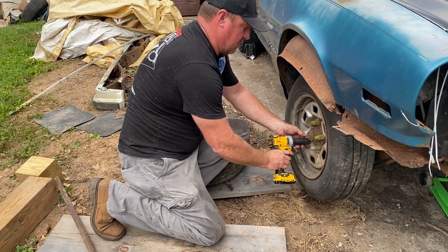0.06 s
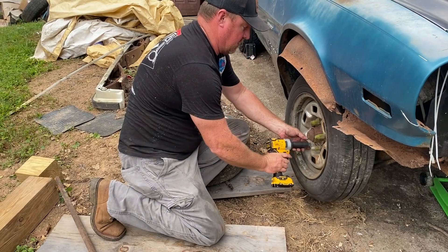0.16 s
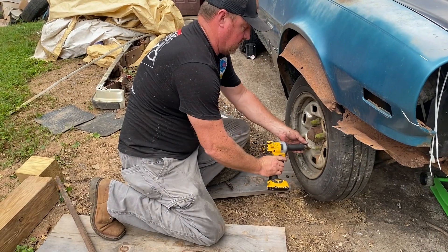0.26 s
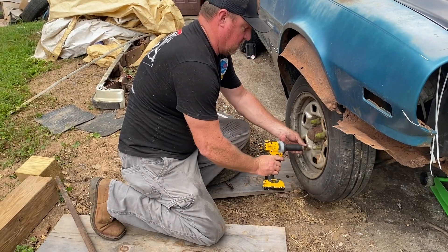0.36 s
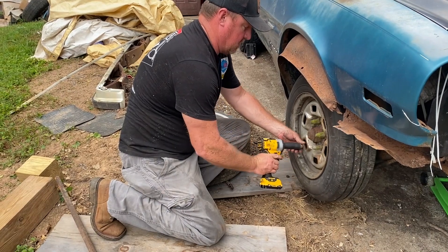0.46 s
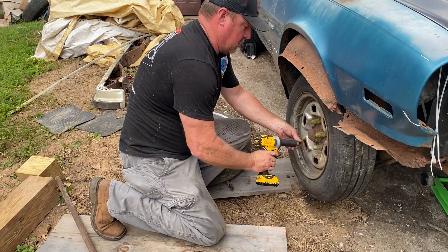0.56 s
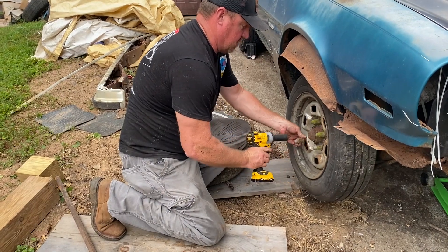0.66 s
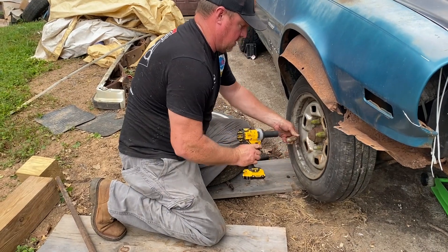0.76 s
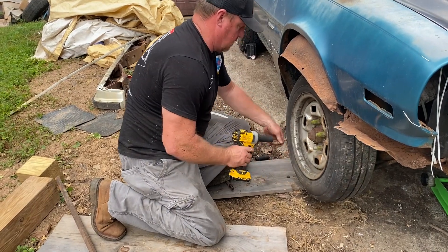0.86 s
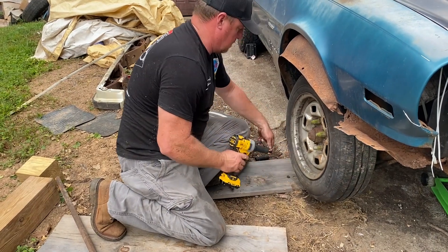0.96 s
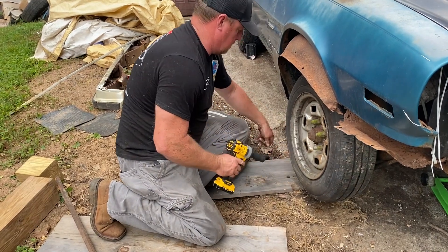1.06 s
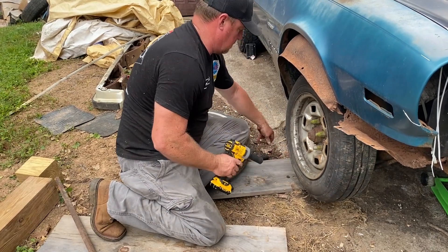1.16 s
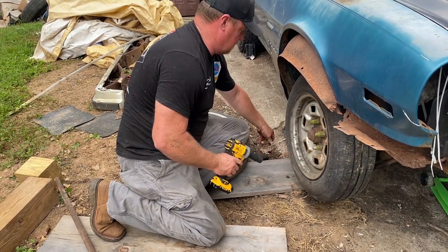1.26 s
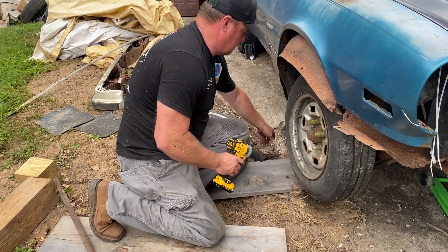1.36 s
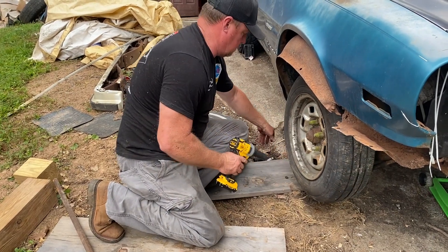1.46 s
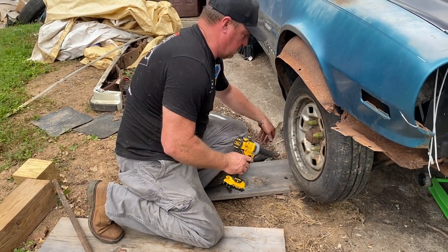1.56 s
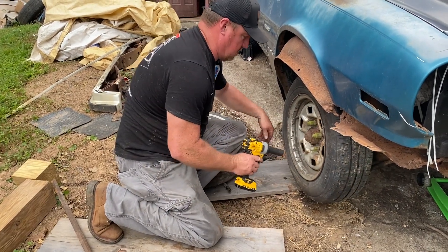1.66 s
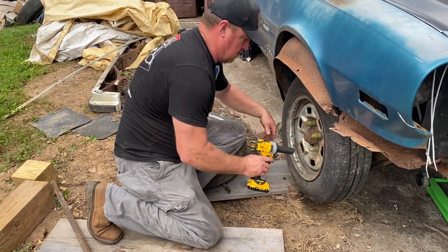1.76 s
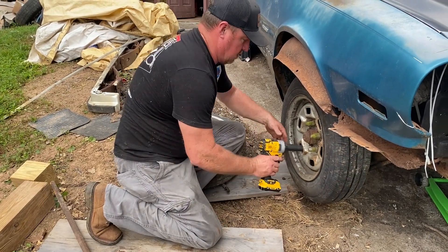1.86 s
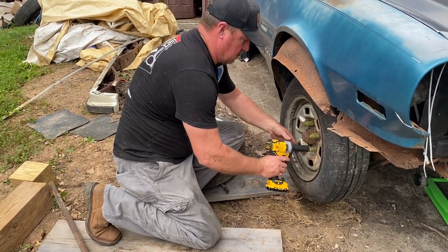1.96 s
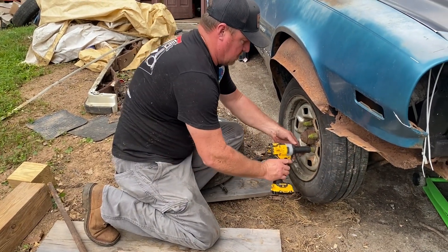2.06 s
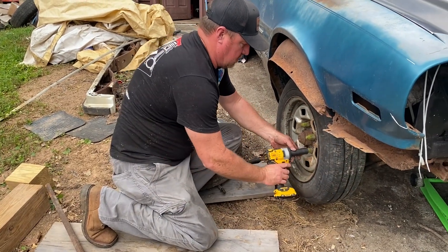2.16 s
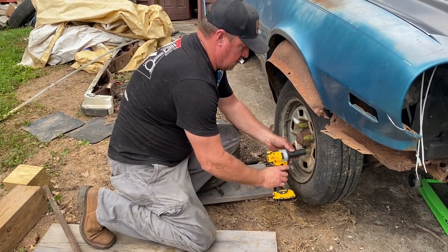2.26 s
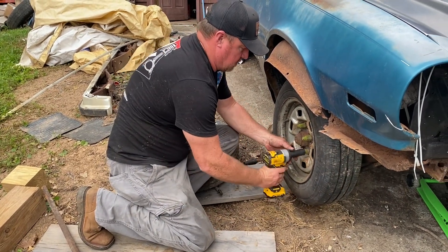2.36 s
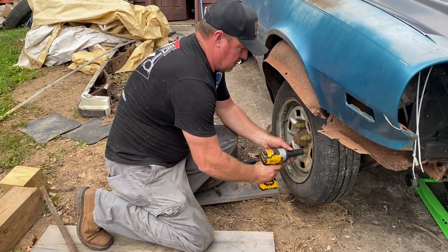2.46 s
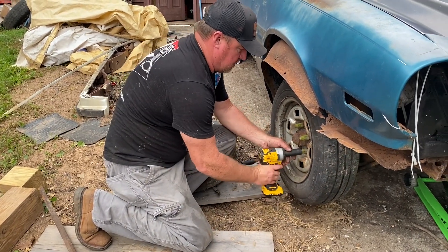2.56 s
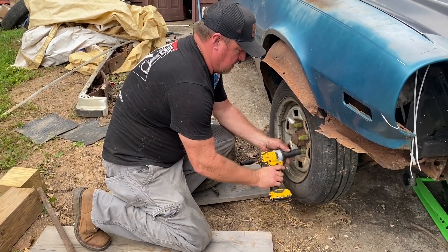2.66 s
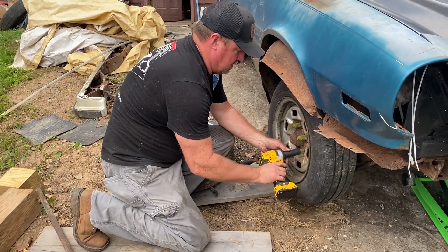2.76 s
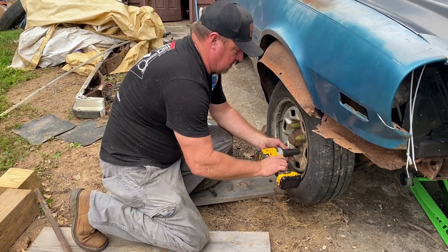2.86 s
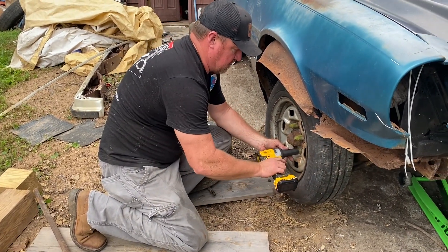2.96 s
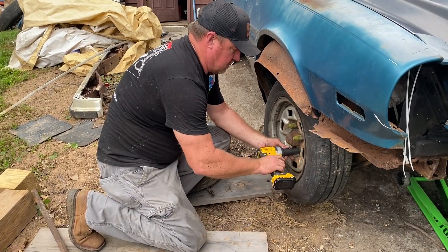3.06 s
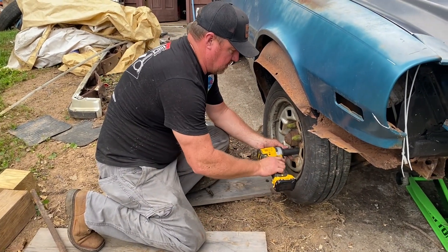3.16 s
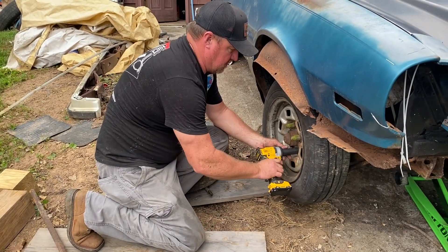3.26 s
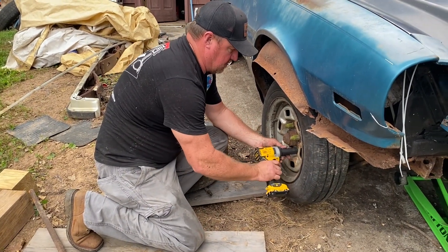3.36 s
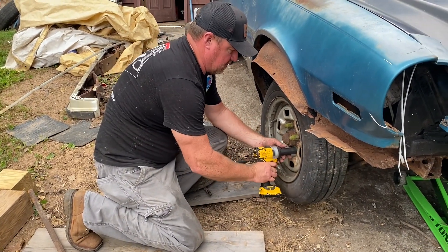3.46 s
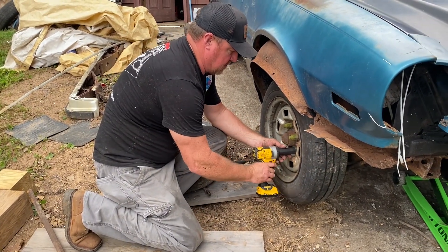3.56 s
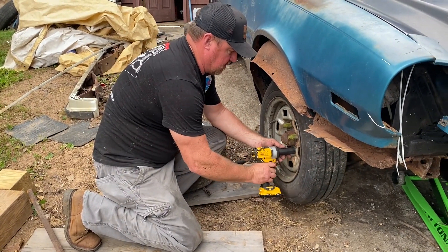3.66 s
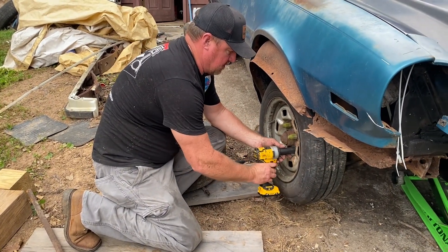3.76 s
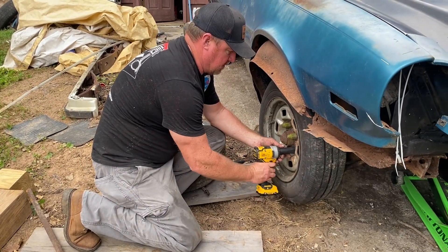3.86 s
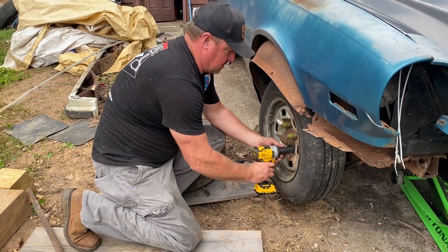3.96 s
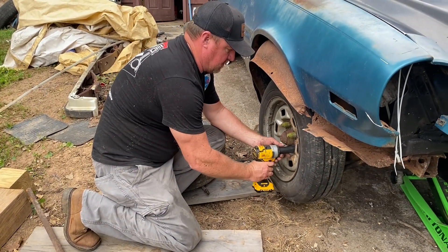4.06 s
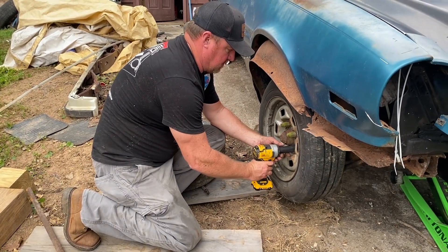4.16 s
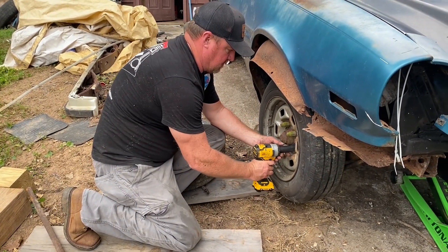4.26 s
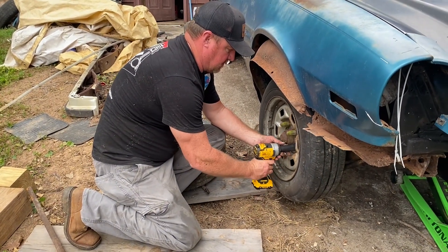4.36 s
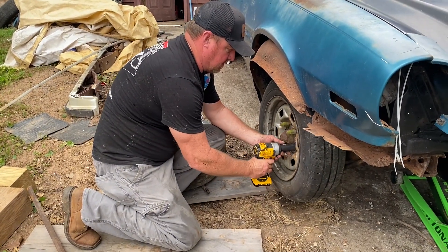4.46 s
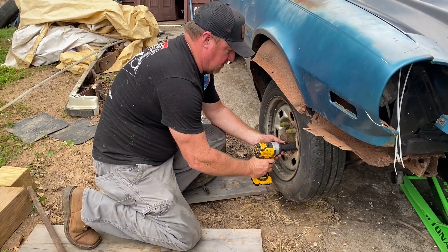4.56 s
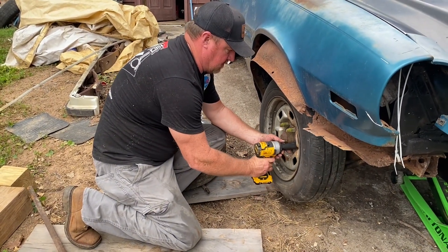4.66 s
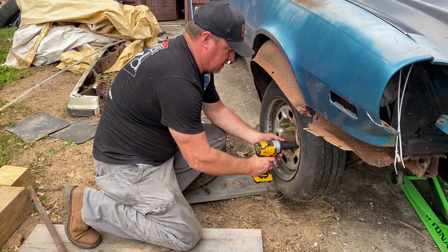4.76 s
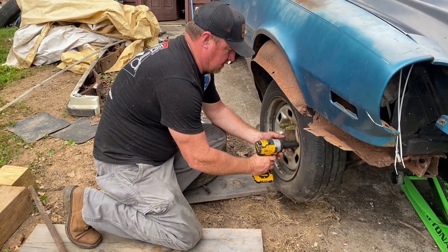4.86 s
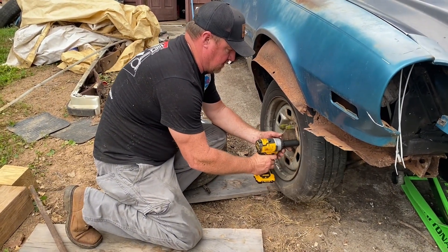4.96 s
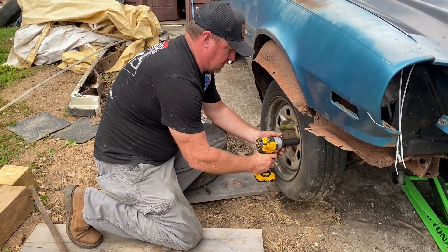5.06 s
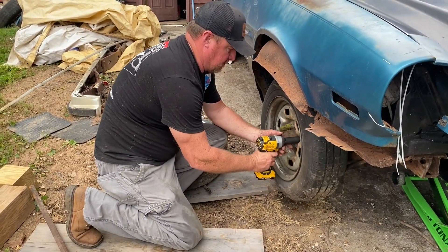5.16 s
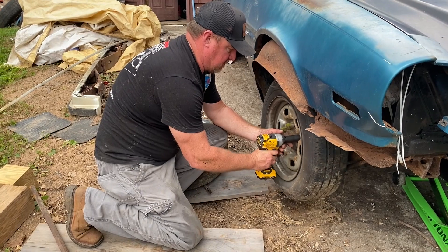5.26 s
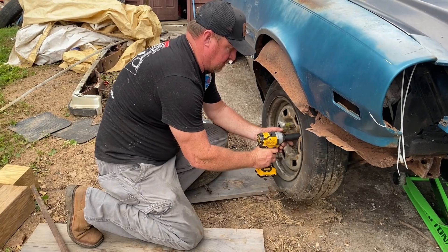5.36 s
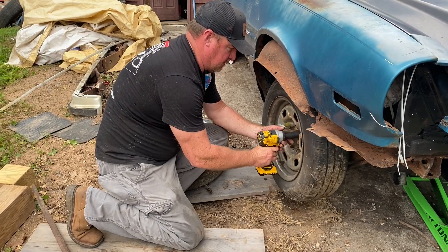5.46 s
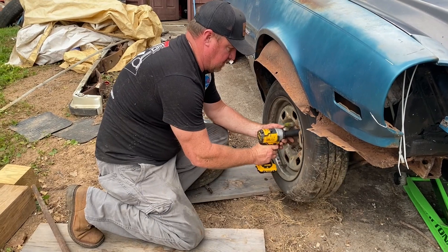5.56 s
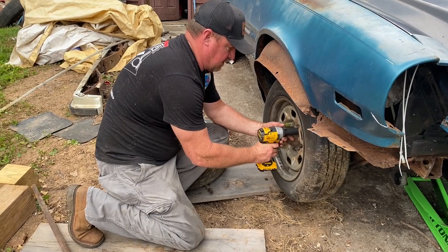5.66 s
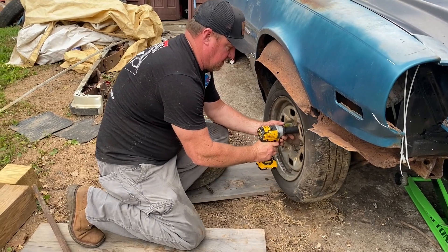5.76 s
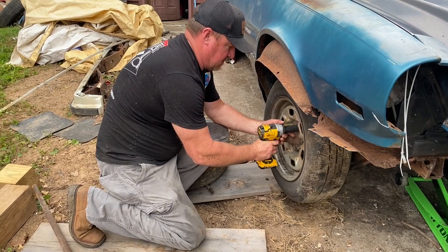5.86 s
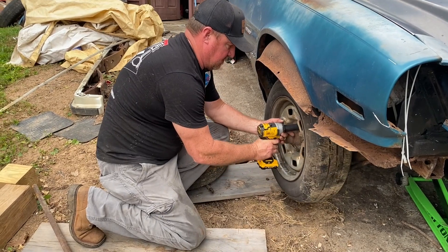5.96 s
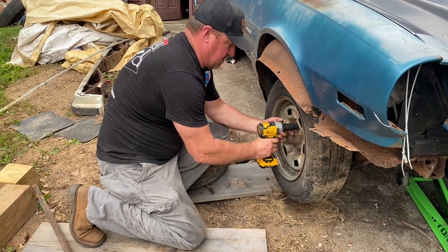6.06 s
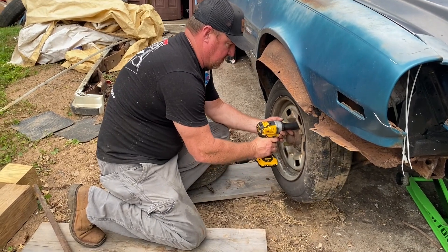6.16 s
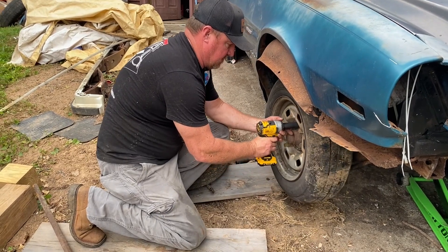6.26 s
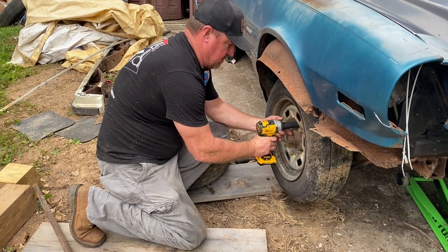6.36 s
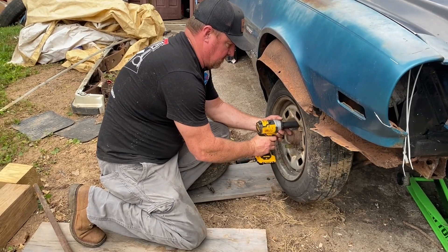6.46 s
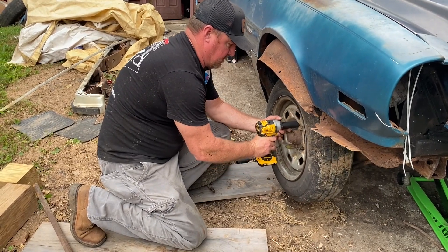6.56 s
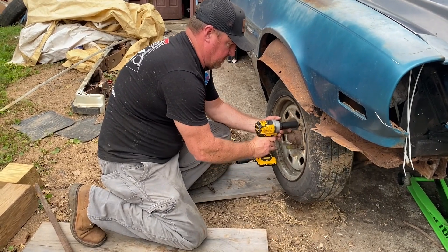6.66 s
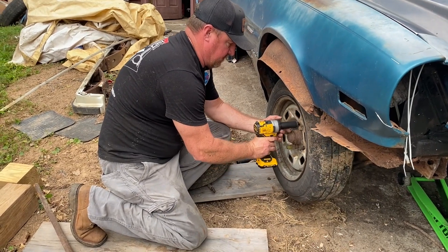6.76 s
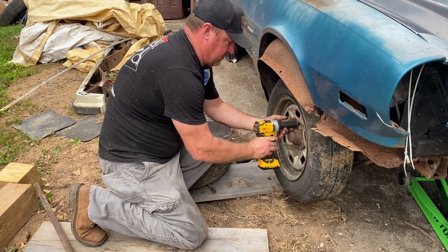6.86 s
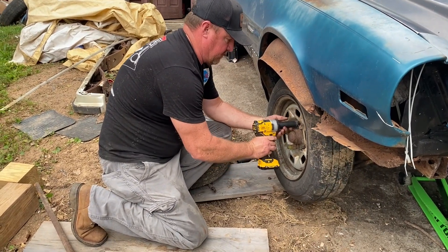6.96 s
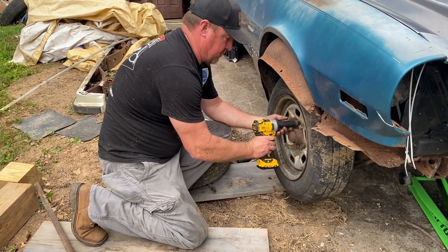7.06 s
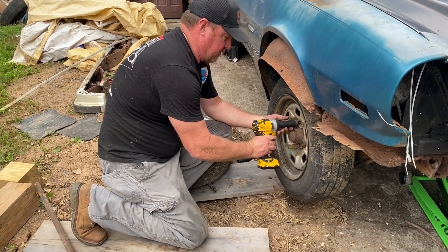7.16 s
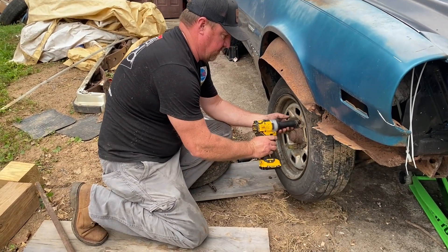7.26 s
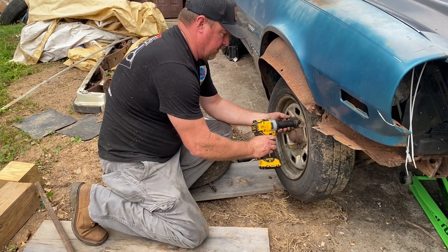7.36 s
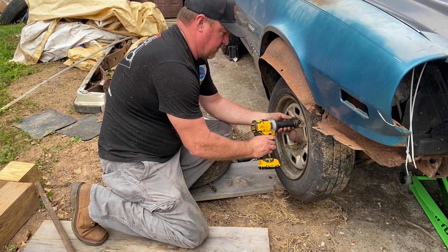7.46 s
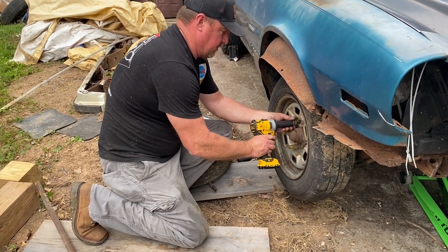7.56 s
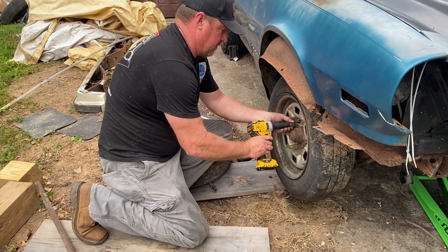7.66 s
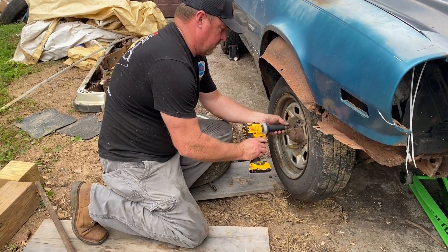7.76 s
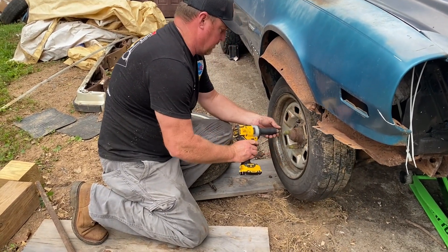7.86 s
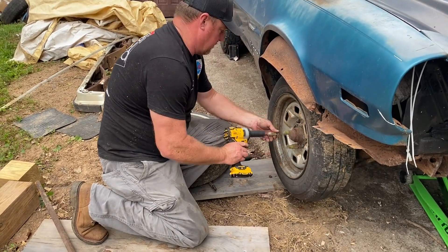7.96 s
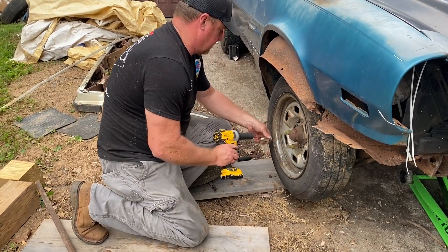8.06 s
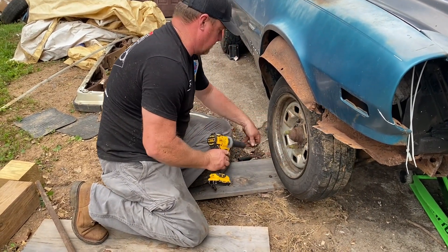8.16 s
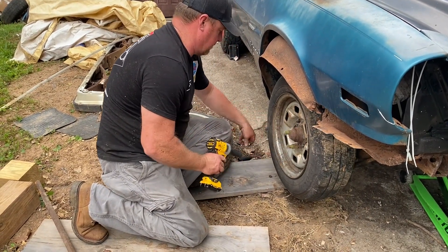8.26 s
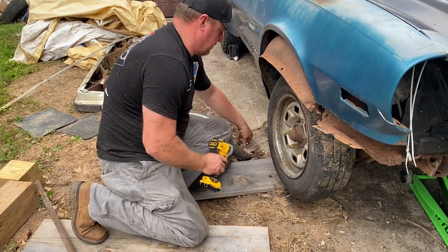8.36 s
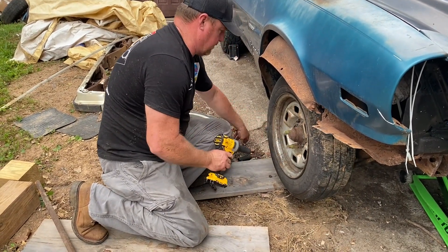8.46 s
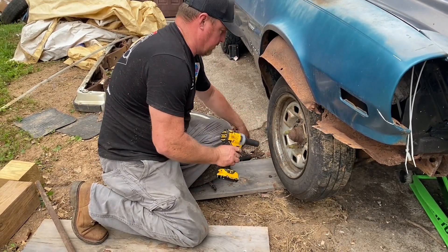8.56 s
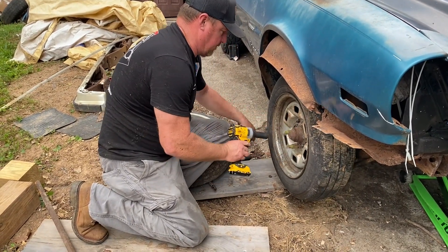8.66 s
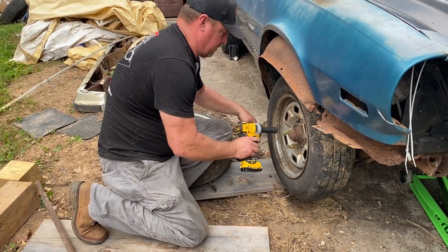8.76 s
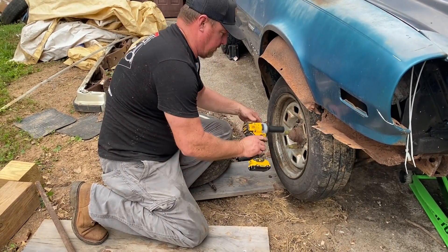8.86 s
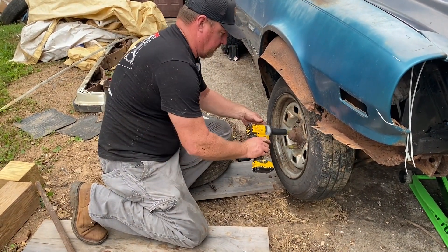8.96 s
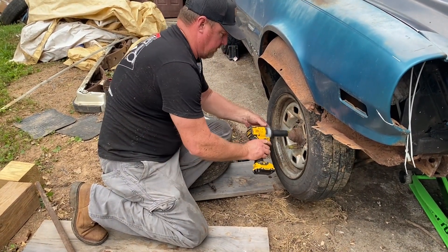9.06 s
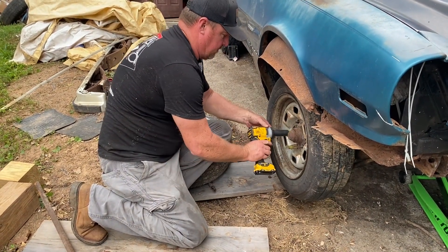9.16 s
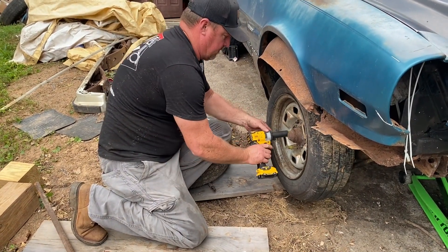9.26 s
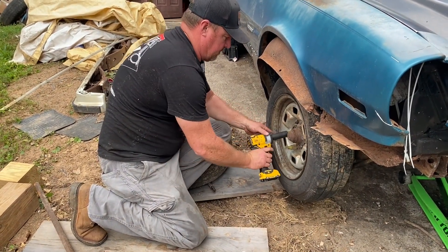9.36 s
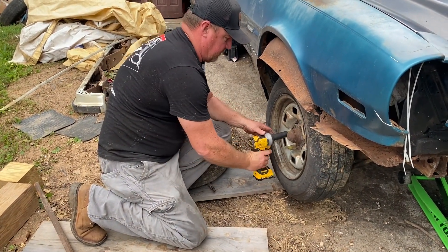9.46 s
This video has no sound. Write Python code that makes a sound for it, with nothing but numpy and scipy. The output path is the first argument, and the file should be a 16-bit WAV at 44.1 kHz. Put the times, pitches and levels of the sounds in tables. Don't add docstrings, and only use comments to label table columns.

```python
import sys
import numpy as np
from scipy import signal
from scipy.fft import rfft, irfft, next_fast_len
from scipy.io import wavfile
from scipy.ndimage import uniform_filter1d, map_coordinates

SR = 44100
rng = np.random.default_rng(int(sys.argv[2]) if len(sys.argv) > 2 else 0)


def output_pcm(signal):
    pcm = np.clip(np.atleast_2d(signal).T, -1, 1) * 32767
    wavfile.write(sys.argv[1], SR, np.round(pcm).astype(np.int16))


def invert_db(level):
    return 10 ** (np.asarray(level, dtype=float) / 20)


N = 418950

# time in seconds, looseness from 0 (pressed hard) to 1 (riding loose).
SEAT = [(3.6, .1), (3.8, .5), (3.97, .2), (4.4, 0), (5.2, .05), (5.45, .5), (5.55, 1), (5.95, 1),
        (6.25, .6)]


def unit(x):
    return x / np.sqrt(np.mean(x ** 2) + 1e-20)


def along(points, hz):
    f, v = np.transpose(points)[:2]
    return np.interp(np.log(hz + 1), np.log(f + 1), v)


def curves(spans, outside=None):
    s, *cols = np.transpose(np.concatenate(spans))
    return [np.interp(np.arange(N) / SR, s, c, outside, outside) for c in cols]


def stages(rows, rise, fall):
    t = np.arange(N) / SR
    levels = []
    for start, end, first, last in rows:
        held = np.interp(t, [start, end], [first, last])
        levels.append(held - rise * np.maximum(start - t, 0) - fall * np.maximum(t - end, 0))
    return np.max(levels, axis=0)


def wobble(rate):
    return map_coordinates(rng.standard_normal(int(N * rate / SR) + 4), [np.arange(N) * rate / SR])


def filtered(x, response):
    m = next_fast_len(N + SR // 2)
    return irfft(rfft(x, m) * response(np.fft.rfftfreq(m, 1 / SR)), m)[..., :N]


def resonances(modes):
    return lambda f: sum(invert_db(db) * 1j * f * w / (c * c - f * f + 1j * f * w) for c, w, db in modes)


def below(hz, edge_hz):
    return 1 / (1 + (hz / edge_hz) ** 6)


def placed(times, rows):
    at = np.round(np.asarray(times) * SR).astype(int)[:, None] + np.arange(rows.shape[1])
    return np.bincount(at.ravel(), rows.ravel(), N + SR)[:N]


def noise(spectrum, alike):
    a, b = filtered(rng.standard_normal((2, N)), lambda hz: invert_db(along(spectrum, hz)))
    turn = np.arccos(np.clip(alike, -1, 1)) / 2
    shared, own = np.cos(turn) * a, np.sin(turn) * b
    return unit(np.array([shared + own, shared - own]))


def blows():
    # time in seconds, blow number.
    bursts = [
        [(3.3683, 0), (3.3974, 1), (3.4189, 2), (3.5586, 9), (3.5823, 10), (3.6039, 11)],
        [(3.7485, 0), (3.8148, 3)],
        [(3.9679, 0), (4.0115, 2), (4.0529, 4), (4.2125, 12), (4.2342, 13), (4.2583, 14)],
        [(4.297, 0), (4.3209, 1), (4.3415, 2), (4.4615, 8), (4.7385, 22), (4.7781, 24), (4.8558, 28),
         (4.9737, 34), (5.2462, 48), (5.3615, 54), (5.7851, 76), (5.9026, 82), (5.9232, 83)],
        [(6.2493, 0), (6.2753, 1), (6.2964, 2), (6.4946, 12), (6.5155, 13), (6.5382, 14)],
    ]
    # time in seconds, clang in dB.
    force = [(3.37, -29.5), (3.41, -15.5), (3.47, -21), (3.58, -21.5), (3.604, -29), (3.77, -15.5),
             (3.815, -18), (3.97, -18.5), (4.07, -18.5), (4.2, -22), (4.3, -23), (4.4, -21.5), (5.2, -24.5),
             (5.55, -26.5), (5.9, -27), (6.25, -26), (6.28, -25.5), (6.54, -27.5)]
    # time in seconds, clang in dB, wait until the bounce in seconds.
    stutter = [(5.95, -23.5, .014), (6.0021, -28.5, 0.014), (6.062, -26.5, 0.012), (6.1234, -28.5, 0.014),
               (6.1883, -28, 0.015)]
    # time in seconds, clang in dB.
    last_bounces = [
        (3.832, -26.5),
        (4.2748, -37.5),
        (6.555, -36.5),
    ]
    # time in seconds, clang in dB.
    nudges = [(3.351, -47.5), (3.7399, -30.5), (3.9343, -39.5), (3.959, -30.5)]
    # time in seconds, clang in dB, crack in dB, sizzle in dB.
    scatter = [.00012, 2, 2.2, 2.4]
    runs = [np.interp(np.arange(k[-1] + 1), k, s) for s, k in map(np.transpose, bursts)]
    s = np.concatenate(runs)
    rate = np.concatenate([1 / np.gradient(run) for run in runs])
    lone = [row[:2] for row in stutter]
    lone += [(at + wait, db - 8) for at, db, wait in stutter]
    lone = np.array(lone + list(last_bounces) + list(nudges))
    clang = np.r_[np.interp(s, *np.transpose(force)), lone[:, 1]]
    full_rate, rate_span = 50, 8
    slow = np.r_[np.clip((full_rate - rate) / rate_span, 0, 1), np.full(len(lone), .7)]
    s = np.r_[s, lone[:, 0]]
    seat = np.interp(s, *np.transpose(SEAT))
    crack = -0.5 * seat - 6 * slow
    sizzle = -9 + 3 * seat
    rows = np.c_[s, clang, crack, sizzle]
    chance = rng.standard_normal(rows.shape) * scatter
    chance[:, 2:] -= chance[:, 1:2]
    return (rows + chance)[np.argsort(s)]


def chatter(rows, drift, fresh):
    # frequency in Hz, level in dB.
    blow_colour = [(40, -33), (450, -27), (1000, -9), (1500, -7.5), (2300, -5.5), (4500, -5), (7500, -4.5),
                   (10500, 1.5), (12500, -4.5), (14800, -2), (15900, -12), (16300, -30), (17000, -34)]
    t = np.arange(drift.shape[1]) / SR
    grit = invert_db(4 * unit(uniform_filter1d(rng.standard_normal(drift.shape), size=12, axis=1)))
    grains = [.4 * drift + .55 * fresh,
              unit(grit * (.7 * drift + .7 * fresh)),
              unit(grit * (.8 * drift + .6 * fresh))]
    rebound = rng.uniform(0.0039, .004, (len(rows), 1))
    again = rng.uniform(0, 0.12, rebound.shape) * (t > rebound) * invert_db(-60 * np.abs(t - rebound) / 0.0025)
    shares = [lambda hz: below(hz, 3500),
              lambda hz: below(hz, 8700) - below(hz, 3500),
              lambda hz: 1 - below(hz, 8700)]
    # rise s, fast t60 s, slow t60 s, slow share
    decays = [(0.00034, 0.037, 0.035, 0.63), (0.00022, 0.017, 0.048, 0.35), (0.00086, 0.029, 0.06, 0.49)]
    damped = 1 / (1 - 0.33 * np.interp(rows[:, :1], *np.transpose(SEAT)))
    out = np.zeros(N)
    for k, (rise, fast, slow, share) in enumerate(decays):
        age = t * damped if k else t
        fade = invert_db(-60 * age / fast) + again + share * invert_db(-60 * age / slow)
        shape = (1 - np.exp(-(t / rise) ** 2)) * fade
        level = invert_db(rows[:, 1] + (rows[:, k + 1] if k else 0))
        burst = placed(rows[:, 0] - .0004, grains[k] * shape * level[:, None])
        out += filtered(burst, lambda hz: invert_db(along(blow_colour, hz)) * shares[k](hz))
    return out


def jaw_snaps(rows, fresh, seat):
    # frequency in Hz, width in Hz, level in dB.
    snap_modes = [(2800, 3000, -1), (6760, 2700, -3)]
    level_db = rows[:, 1:2] + 3.5 * fresh[:, :1]
    snaps = placed(rows[:, 0] + .0003, -invert_db(level_db))
    return filtered(snaps * invert_db(4.5 + 4 * seat), lambda hz: resonances(snap_modes)(hz) * below(hz, 9000))


def wheel_and_socket(drive, seat, tight):
    # frequency in Hz, width in Hz, level in dB.
    pressed = [(1070, 150, -11), (1400, 250, -7), (1600, 100, -8), (2300, 1000, -13), (2705, 100, 2),
               (3250, 70, -8), (4400, 110, -10), (4800, 250, -17), (6700, 90, -12), (14610, 1100, -5)]
    # frequency in Hz, width in Hz, level in dB.
    riding = [(1129, 60, -7), (1377, 51, -2), (1840, 170, 3), (2770, 58, -4), (3250, 57.3, -14),
              (3840, 1000, -12), (5980, 100, -13), (6980, 800, -8.5)]
    # frequency in Hz, width in Hz, level in dB.
    socket_notes = [
        (2070, 230, -3),
        (2290, 130, -3),
    ]
    body = filtered(drive * seat, resonances(riding))
    for part, note in zip((1 - tight, tight), socket_notes):
        body += filtered(drive * (1 - seat) * part, resonances(list(pressed) + [note]))
    return body


def thuds(rows, drift, taps, seat, tight):
    # frequency in Hz, level in dB.
    thud_colour = [(25, -37), (50, -7.5), (110, -3.5), (160, -9), (260, -14), (400, -10.5), (620, -10),
                   (800, -7), (1200, -4.5), (2200, -37.5)]
    # frequency in Hz, pressed level in dB, loose level in dB, t60 in seconds.
    rim_notes = [(1370, -10, 2, .25), (2112, -8, -8, .07), (2266, -7, -7, .1), (2716, 0, -8, .22),
                 (3258, -9, -9, .1), (4787, -14, -14, .08), (5960, -17, -12, .2)]
    # frequency in Hz, width in Hz, level in dB.
    hub_pressed = [(197, 40, -9), (330, 60, 1), (440, 70, -1.5), (780, 170, -5)]
    # frequency in Hz, width in Hz, level in dB.
    hub_riding = [(370, 60, -2), (513.8, 60, -1.7), (705, 80, 1), (920, 130, -7)]
    t = np.arange(drift.shape[1]) / SR
    fade = (1 - np.exp(-t / 0.00049)) * invert_db(rows[:, 1:2] - 60 * t / 0.094)
    shock = unit(drift + .6 * drift[0]) * fade
    thud = filtered(placed(rows[:, 0], shock), lambda hz: invert_db(along(thud_colour, hz)))
    thud *= invert_db(2.5 + 4 * seat)
    hub_level = invert_db(23 - 5 * (1 - tight))
    for k, (part, hub) in enumerate([(1 - seat, hub_pressed), (seat, hub_riding)]):
        rim = [(m[0], np.log(1000) / (np.pi * m[3]), m[1 + k] + 44 - 10.5 * k) for m in rim_notes]
        thud += filtered(taps * part, resonances(rim))
        thud += filtered(taps * part * hub_level, resonances(hub))
    return thud


def hammer():
    rows = blows()
    shape = (len(rows), SR // 25)
    drift = unit(uniform_filter1d(rng.standard_normal(shape), size=13, axis=0))
    fresh = rng.standard_normal(shape)
    seat, = curves([SEAT])
    tight = np.interp(np.arange(N) / SR, (4.7, 4.95), [0, 1])
    rattle = chatter(rows, drift, fresh)
    taps = placed(rows[:, 0], -invert_db(rows[:, 1:2]))
    push = uniform_filter1d(uniform_filter1d(taps, size=4), size=4)
    drive = rattle + invert_db(15) * np.roll(push, round(.0003 * SR))
    body = wheel_and_socket(drive, seat, tight)
    steel = rattle + jaw_snaps(rows, fresh, seat) + invert_db(7) * body
    return invert_db(13) * steel + thuds(rows, drift, taps, seat, tight)


def motor():
    # frequency in Hz, level in dB per Hz.
    gear_colour = [(100, -32), (400, -10), (1000, -6), (1900, 5.5), (3500, 0), (5500, -1.5), (7500, -6.5),
                   (10500, -6.5), (14500, -14), (15800, -13), (16100, -44.5)]
    # time in seconds, tooth-mesh frequency in Hz, level in dB.
    whine = [(3.7, 1500, -90), (3.71, 1750, -46), (3.728, 2050, -40), (3.74, 2100, -50), (3.75, 2100, -150),
             (6.53, 1800, -150), (6.54, 1800, -66), (6.57, 1810, -48), (6.62, 1870, -43),
             (6.7, 1890, -44.5), (6.79, 1910, -44), (6.8, 1500, -56), (6.815, 1250, -50), (6.83, 1150, -88)]
    # multiple of the mesh frequency, level in dB.
    mesh_lines = [(.5, -22), (1.03, 0), (1.52, -18), (1.97, -4), (3.05, -11), (3.97, -4.5), (5.95, -16)]
    # start in seconds, end in seconds, first level in dB, last level in dB.
    load = [(3.35, 3.93, -51.5, -60.5), (3.395, 3.58, -31, -34), (3.74, 3.83, -33.5, -37),
            (3.96, 4.3, -34, -34), (4.3, 4.7, -39, -37.5), (4.7, 5.93, -38, -37), (5.98, 6.24, -48, -49.5),
            (6.28, 6.54, -40.5, -35.5), (6.6, 6.79, -45, -44.5), (6.8, 6.85, -47, -53.5)]
    turn = 2 * np.pi * np.cumsum(106 + 5 * wobble(30)) / SR
    throb = invert_db(3 * np.sin(turn) + 1.5 * wobble(150))
    hiss = unit(throb * filtered(rng.standard_normal(N), lambda hz: invert_db(along(gear_colour, hz))))
    mesh_hz, whine_db = curves([whine], outside=-150)
    lines = np.zeros(N)
    for multiple, db in mesh_lines:
        phase = 2 * np.pi * np.cumsum(multiple * (mesh_hz + 42 * wobble(300))) / SR
        lines += invert_db(db + 2.5 * wobble(200)) * np.sin(phase)
    load_db = stages(load, 510, 270)
    power_db = stages([(3.35, 6.853, 0, 0)], 1500, 1500)
    return invert_db(load_db + power_db) * hiss + invert_db(whine_db) * np.sqrt(throb) * lines


def clicks(t):
    # time in seconds, peak in dB, centre in Hz, t60 in seconds, sizzle against the rest in dB.
    click_events = [(1.46, -34, 4300, 0.046, -8), (1.4685, -42, 3000, 0.03, -15),
                    (2.035, -45, 2290, 0.089, -31), (2.07, -41, 2200, 0.045, -23),
                    (2.081, -33.5, 1700, 0.064, -20.5), (2.386, -53.5, 988, 0.05, -27),
                    (2.413, -51.5, 1130, 0.05, -32), (2.534, -50.5, 937, 0.043, -38),
                    (2.861, -50.5, 1690, 0.054, -31), (3.101, -39.5, 993, 0.091, -34.5),
                    (3.154, -32.5, 1330, 0.069, -35), (7.082, -53, 2100, 0.05, -9),
                    (7.109, -23.5, 4850, 0.048, -2.5), (7.167, -36, 4850, 0.029, 7),
                    (7.193, -52, 1360, 0.05, 5), (7.227, -26, 1400, 0.032, 0),
                    (7.52, -31.5, 2070, 0.062, -10.5), (7.6, -44.5, 2770, 0.077, -16),
                    (7.632, -52, 1190, 0.08, -18), (7.98, -58, 3000, 0.042, -15),
                    (9.02, -48, 1200, 0.04, -34), (9.026, -51.5, 2500, 0.05, -30),
                    (9.089, -40.5, 3960, 0.044, -27), (9.104, -43.5, 2190, 0.065, -25.5),
                    (9.194, -46, 1070, 0.081, -21)]
    s, db, hz, t60, sizzle_db = np.transpose(click_events)[..., None]
    knock_db = -41.5 - 1.18 * sizzle_db
    f = np.fft.rfftfreq(len(t), 1 / SR)
    colour = invert_db(-5.5) / (1 + (900 / (f + 1)) ** 4 + (f / 6000) ** 4)
    colour = colour + 0.8 / (1 + ((f - hz) / (0.33 * hz)) ** 2)
    colour /= 1 + (.6 * np.minimum(hz, 1400) / (f + 1)) ** 6
    colour += invert_db(sizzle_db + 5.5) * (f > 8000) * invert_db(-f / 1500) * (f < 16000)
    colour += invert_db(knock_db + 14.5) * (f > 150) / (1 + (f / 600) ** 4)
    ring = irfft(rfft(rng.standard_normal((len(s), len(t)))) * colour, len(t))
    ring /= ring.std(1)[:, None]
    fade = invert_db(-60 * t / t60) + 0.86 * invert_db(-60 * t / 0.0068)
    return placed(s[:, 0], invert_db(db - 8) * ring * fade * (1 - np.exp(-t / 0.0001)))


def nut_drop(t):
    # time in seconds, level in dB, start pitch in Hz, end pitch in Hz, t60 in seconds.
    drop_events = [
        (1.499, -38, 1000, 480, .05),
        (1.508, -35, 450, 250, .1),
    ]
    out = np.zeros(N)
    for s, db, start_hz, end_hz, t60 in drop_events:
        pitch = end_hz + (start_hz - end_hz) * np.exp(-t / .006)
        dull = uniform_filter1d(uniform_filter1d(rng.standard_normal(len(t)), size=19), size=19)
        tone = np.sin(2 * np.pi * np.cumsum(pitch) / SR) + 4 * invert_db(-60 * t / .05) * dull
        out += placed([s], (invert_db(db - 60 * t / t60) * (1 - np.exp(-t / .002)) * tone)[None])
    return out


def scrapes():
    # start in seconds, end in seconds, first level in dB, last level in dB.
    slides = [
        (7.08, 7.2, -53, -53),
        (7.215, 7.3, -73, -77),
        (7.47, 7.63, -65.5, -59.5),
    ]
    steel = resonances([(1400, 130, 8), (2545, 1800, 2), (2710, 130, 7), (4780, 230, 7), (10600, 3000, -11)])
    grit = filtered(rng.standard_normal(N), lambda hz: (hz < 15900) * below(hz, 11000) * steel(hz))
    return invert_db(stages(slides, 4000, 1200)) * unit(grit * invert_db(2.7 * wobble(90)))


def handling():
    # time in seconds, frequency in Hz, level in dB, t60 in seconds.
    nut_rings = [(1.461, 15300, -40, .3), (1.46, 6900, -42, .05), (1.462, 1502, -47, .05),
                 (1.461, 3160, -47, .04), (2.035, 2250, -43, .035), (2.036, 2730, -46, .04),
                 (2.04, 3300, -56, .07), (2.068, 2220, -34, .05), (2.069, 2600, -39, .05),
                 (2.078, 2200, -52, .2), (2.09, 2730, -54, .25), (2.079, 3300, -55, .08),
                 (2.082, 1400, -55, .15), (9.093, 2110, -50, .2), (9.096, 2450, -52, .05),
                 (9.194, 1034, -50, .05), (9.194, 1750, -52, .04), (9.193, 2400, -48, .06)]
    t = np.arange(SR // 3) / SR
    out = clicks(t) + nut_drop(t) + scrapes()
    for s, hz, db, t60 in nut_rings:
        out += placed([s], invert_db(db - 60 * t / t60)[None] * np.sin(2 * np.pi * hz * t))
    return out


def ports(x):
    # frequency in Hz, phase by which the left port leads in radians.
    lead = [(0, 0), (520, -.3), (950, 0), (4650, .2), (5680, -.5), (6370, 0), (7410, -.5), (8800, -3.1),
            (11400, -6.5), (13350, -9.5), (15200, -12.5), (16500, -12.6)]
    # frequency in Hz, left over right in dB.
    tilt = [(60, 2), (180, -1), (550, -5), (1650, -1), (4970, 2), (15000, -0.5)]

    def half(hz):
        return invert_db(along(tilt, hz) / 2) * np.exp(.5j * np.interp(hz, *np.transpose(lead)))

    return filtered(x, lambda hz: np.array([half(hz), 1 / half(hz)]))


def walls(x):
    # frequency in Hz, t60 in seconds.
    fade_times = [(200, 0.3934), (2000, 0.12), (10000, 0.032)]
    # frequency in Hz, level in dB.
    echo_colour = [(60, -22.5), (300, -9), (700, -1), (3000, -1.5), (7000, 6), (12000, -4)]
    hz, t, z = signal.stft(rng.standard_normal((2, SR // 3)), SR, nperseg=256)
    fade = invert_db(-60 * t / along(fade_times, hz)[:, None])
    tail = signal.istft(z * fade, SR, nperseg=256)[1]
    x = filtered(x, lambda hz: invert_db(along(echo_colour, hz)))
    return signal.fftconvolve(x[None], tail / np.linalg.norm(tail[0]), axes=1)[:, :N]


def traffic():
    # time in seconds, level in dB.
    traffic_level = [(0, -57), (.8, -61.5), (2, -60.5), (3, -57), (3.23, -51), (3.3, -52), (6.9, -57.5),
                     (8.1, -62.5), (9, -58), (9.5, -57.5)]
    # frequency in Hz, level in dB per Hz.
    rumble = [(15, -52.5), (25, -16.5), (42, -8), (113, -1.5), (205, -12.5), (243, -10), (260, -16.5),
              (467, -24), (576, -44), (700, -52), (910, -66.5), (1540, -120)]
    # start in seconds, end in seconds, first level in dB, last level in dB.
    revs = [(6.9, 7.06, -51, -61), (7.16, 7.6, -55.5, -57.5), (7.8, 7.83, -51, -51),
            (8.4, 8.49, -44.5, -48), (8.76, 8.84, -49, -48.5), (9.02, 9.16, -38.5, -46),
            (9.36, 9.42, -44.5, -43)]
    # frequency in Hz, level in dB per Hz.
    drone = [(30, -120), (60, -41), (85, -7.5), (112, 10.5), (135, -8.5), (180, -47.5), (400, -120)]
    engine_db = np.maximum(-60, stages(revs, 200, 120))
    return (invert_db(curves([traffic_level])[0] + 1.0) * noise(rumble, alike=0.94)
            + invert_db(engine_db - 3.5) * noise(drone, alike=0.98))


def wind():
    # frequency in Hz, level in dB per Hz.
    rustle = [(290, -33.5), (500, -2), (577, -9), (624, -4.5), (2510, -11.5), (3450, -17), (4970, -18),
              (5740, -25), (7000, -19.5), (9100, -47), (15400, -120)]
    # time in seconds, level in dB.
    gust = [(0, -91), (2, -86), (2.7, -75.5), (7.6, -75), (8.6, -67), (9.5, -65.5)]
    # frequency in Hz, level in dB per Hz.
    flap = [(500, -29), (1000, -5), (1500, -1), (2600, -2.5), (3200, -11), (6000, -18), (9000, -59.5)]
    return (invert_db(-71.5 + 1.1 * wobble(11)) * noise(rustle, alike=0.069)
            + invert_db(curves([gust])[0] + 1.5 * wobble(6)) * noise(flap, alike=0.3))


def insects():
    # time in seconds, level in dB.
    chorus = [(0, -77.5), (3.3, -76.5), (6.9, -84), (7.9, -80), (8.6, -77.5), (9.5, -77)]
    # frequency in Hz, level in dB per Hz.
    insect_colour = [(3820, -57.5), (6500, -19), (7810, 4), (8220, -6.5), (9050, -29), (10300, -13.5),
                     (12500, -27.5), (16200, -58.5), (22000, -120)]
    return invert_db(curves([chorus])[0] + 1.1 * wobble(40)) * noise(insect_colour, alike=0.16)


def hum():
    # frequency in Hz, level in dB.
    hum_tones = [(59.2, -64), (237, -71), (2584, -86)]
    t = np.arange(N) / SR
    out = np.zeros(N)
    for hz, db in hum_tones:
        out += invert_db(db + 4.5 + 0.83 * wobble(26.0)) * np.sin(2 * np.pi * hz * t + 0.32 * wobble(24))
    return out


def yard():
    left, right = traffic() + wind() + insects()
    return np.array([np.roll(left, 16), right]) + hum()


def scene():
    near = hammer() + motor() + handling()
    return ports(near) + invert_db(-10.0) * walls(near) + yard()


def low_pass(x):
    return signal.sosfilt(signal.butter(12, 16970, fs=SR, output="sos"), x)


def record(dry):
    # frequency in Hz, level in dB.
    top = [(15800, 0), (16100, -7), (16500, -10), (16700, -35)]
    soft = dry / (1 + np.abs(dry / .98) ** 4) ** .25
    soft = filtered(soft, lambda hz: invert_db(along(top, hz)))
    return low_pass(soft)


dry = scene()
out = record(dry)
output_pcm(out)
```